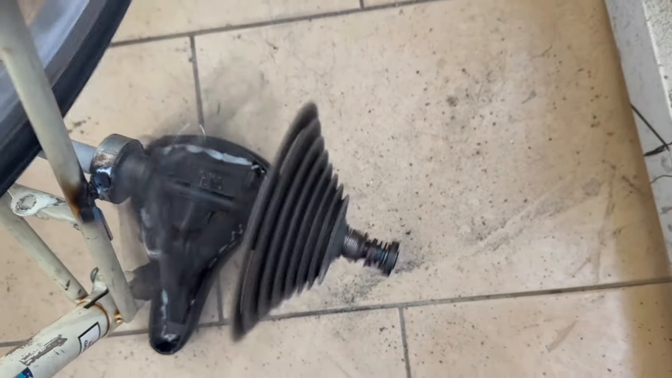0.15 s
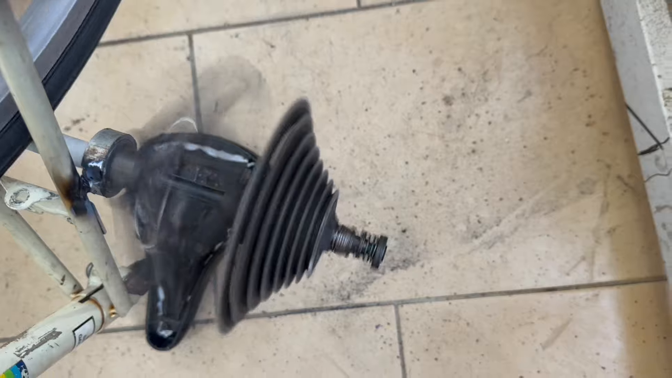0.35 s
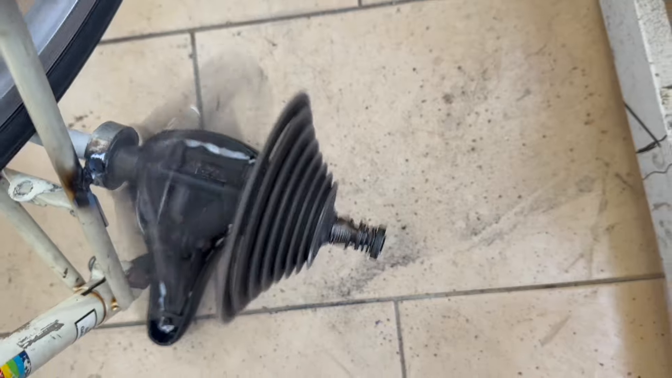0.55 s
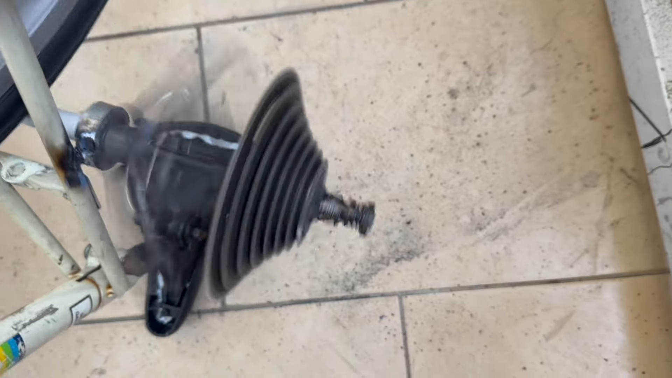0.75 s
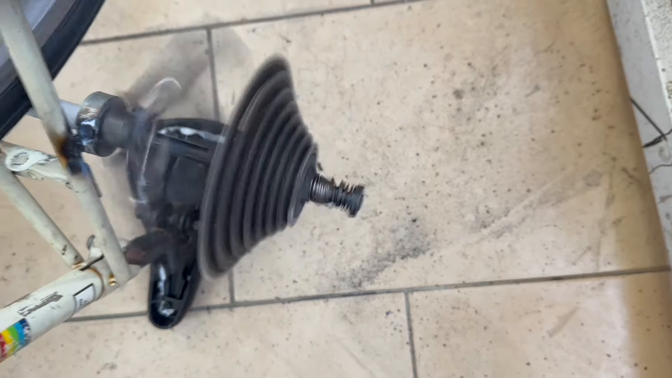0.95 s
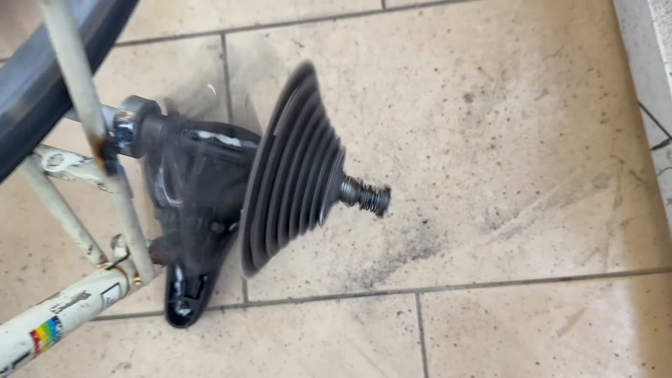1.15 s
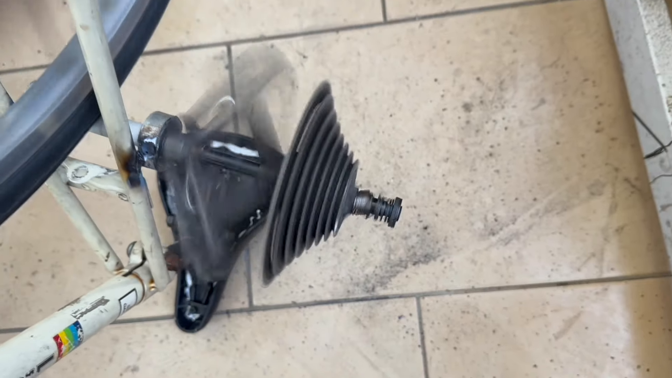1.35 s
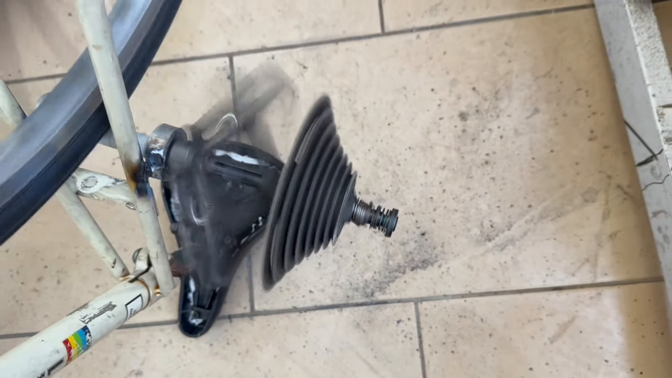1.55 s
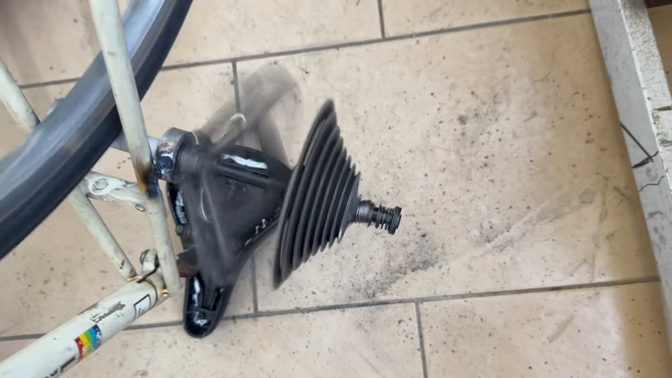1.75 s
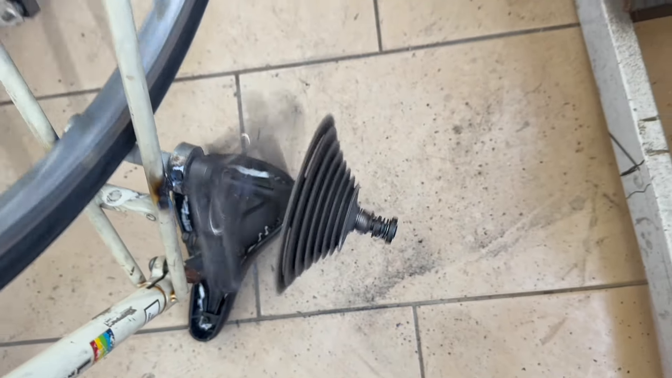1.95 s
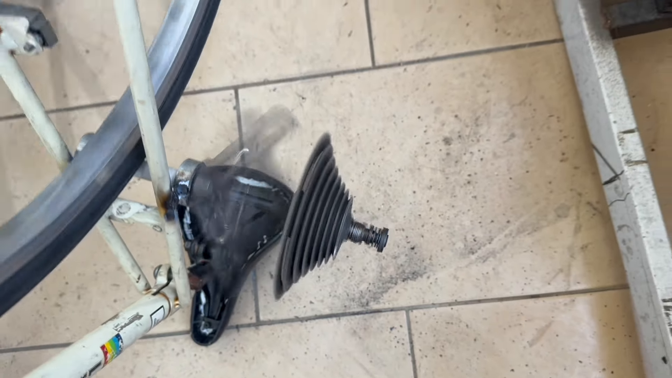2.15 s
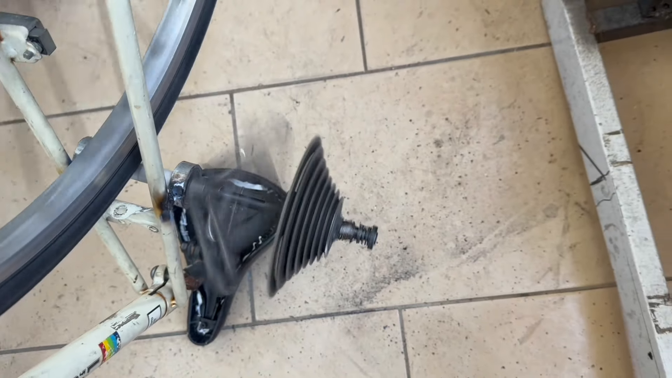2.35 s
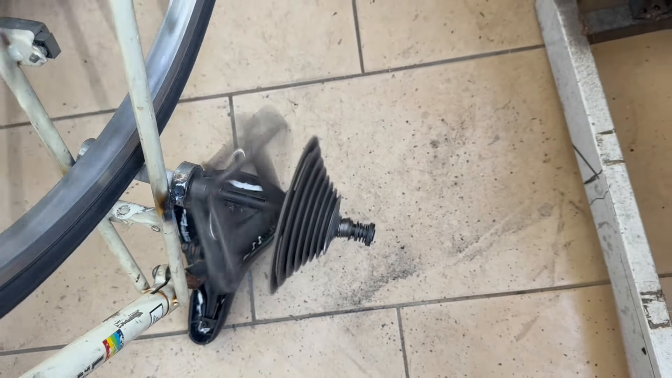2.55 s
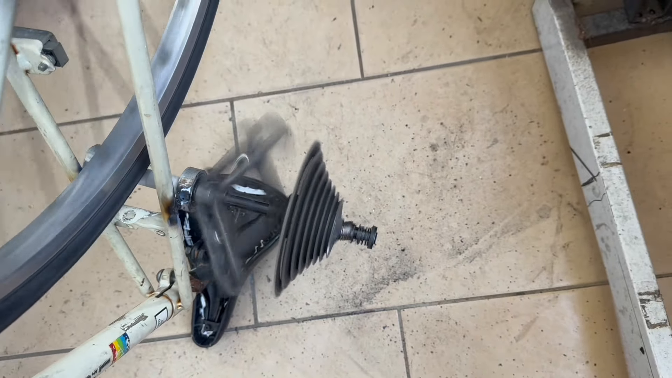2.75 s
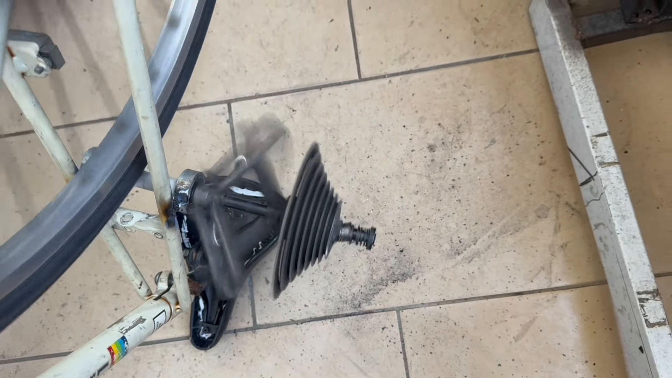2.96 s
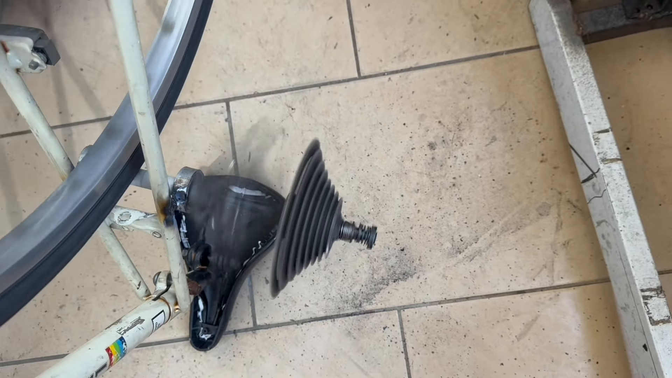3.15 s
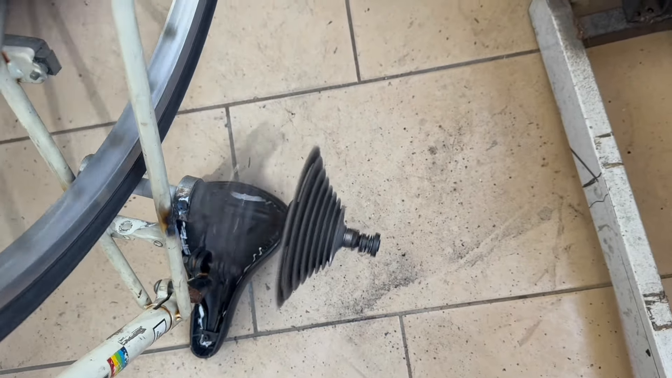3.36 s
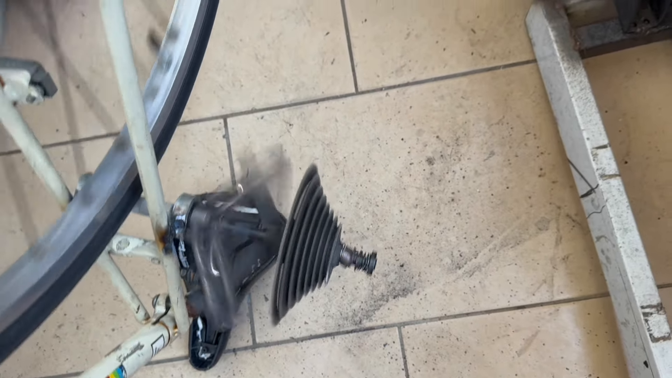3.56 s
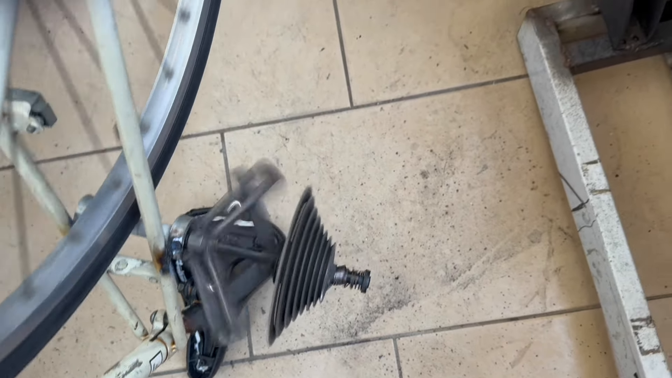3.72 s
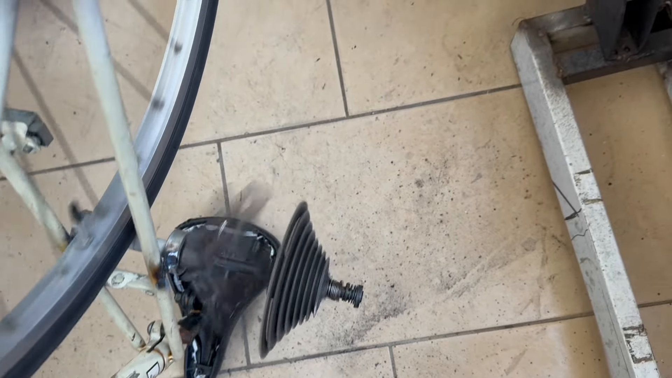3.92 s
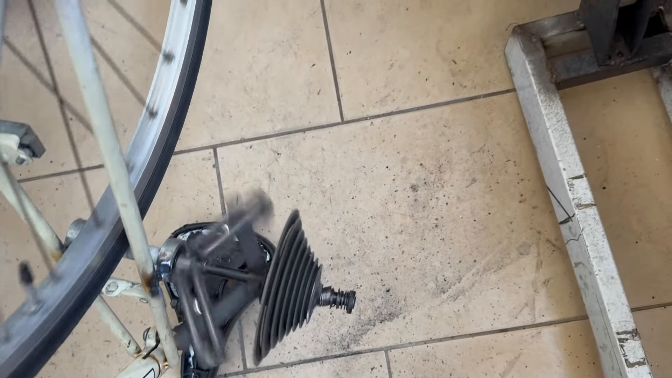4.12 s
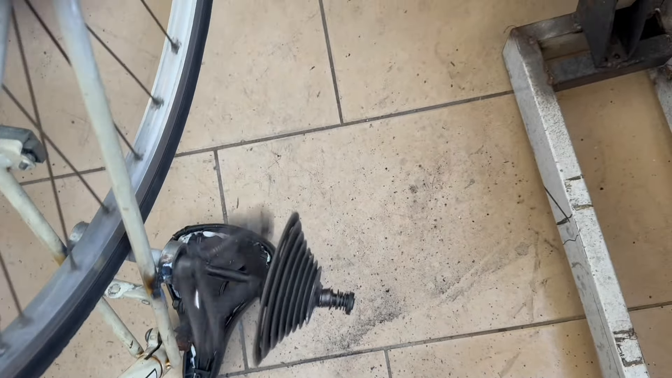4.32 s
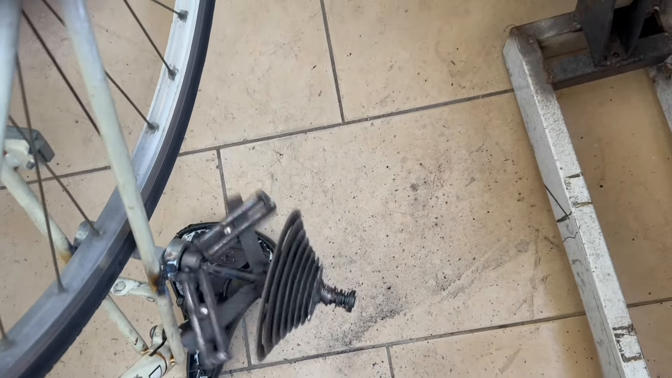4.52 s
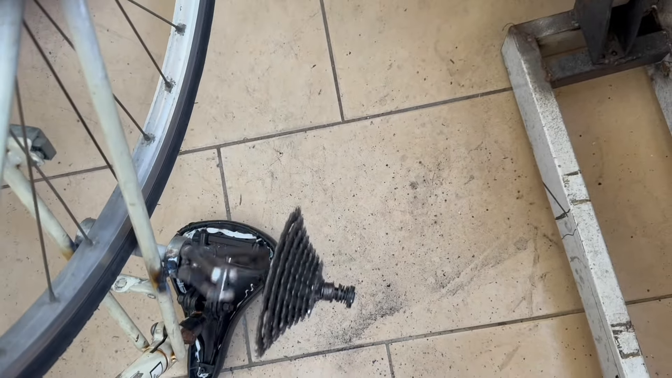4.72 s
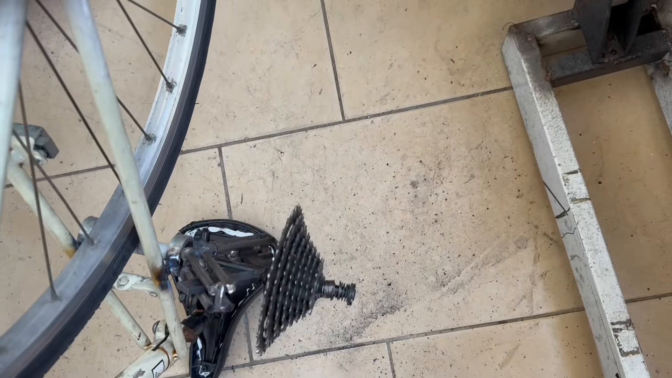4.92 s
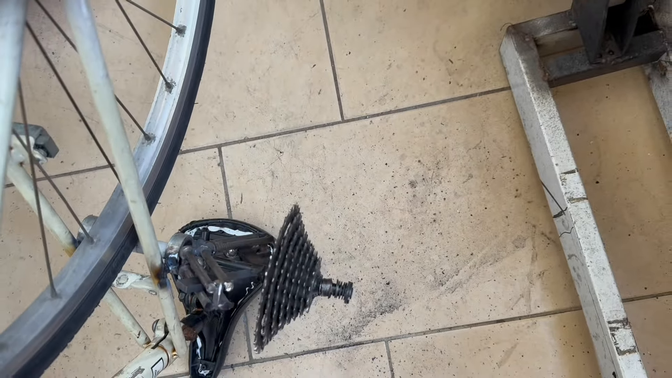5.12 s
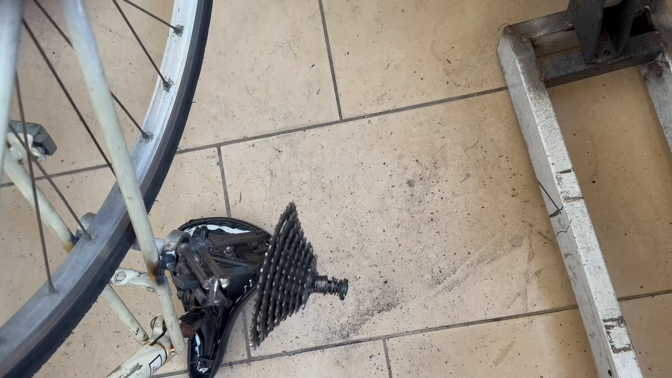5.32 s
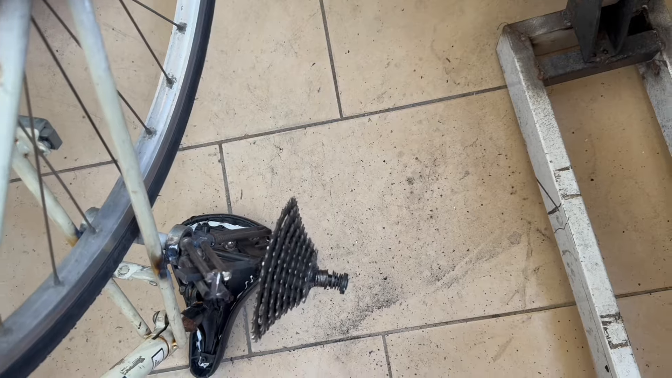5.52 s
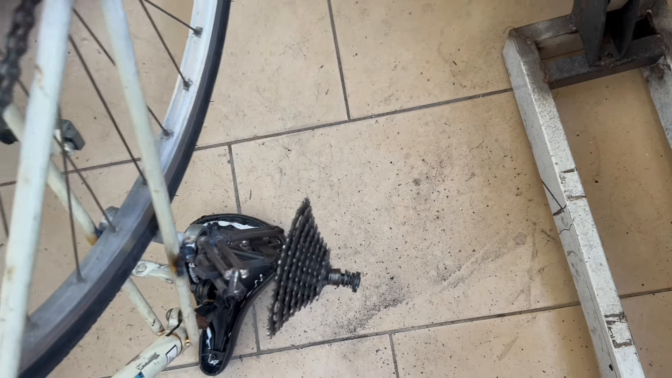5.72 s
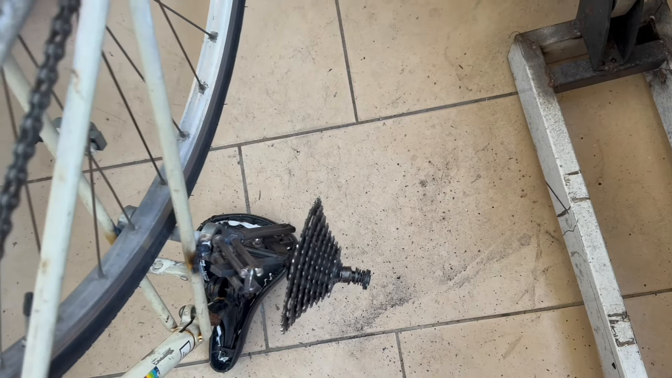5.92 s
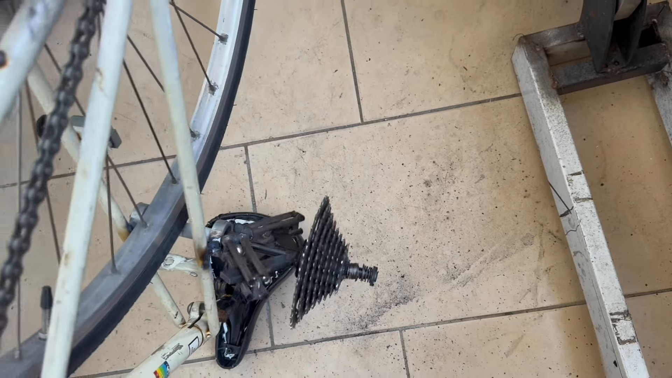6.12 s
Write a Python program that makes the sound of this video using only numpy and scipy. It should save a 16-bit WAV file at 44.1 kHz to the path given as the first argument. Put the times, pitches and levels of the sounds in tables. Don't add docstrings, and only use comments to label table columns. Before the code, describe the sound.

Close up in a tiled workshop, a bicycle freewheel coasts down. Crisp, bright metal clicks begin at over twenty a second, slow gradually, then quickly thin to separate ticks over a fading bearing whir. A cluster of rattling knocks with one hard crack follows the slowdown. Then only low rumble, soft room wash, tiny rubs and a small late tap remain. Stereo, leaning slightly left.

```python
import sys
import numpy as np
from scipy import signal
from scipy.fft import rfft, irfft, next_fast_len
from scipy.io import wavfile
from scipy.ndimage import uniform_filter1d

SR = 44100
rng = np.random.default_rng(int(sys.argv[2]) if len(sys.argv) > 2 else 0)


def master(y):
    cut = np.clip(np.atleast_2d(y).T, -1, 1)
    pcm = np.round(cut * 32767)
    wavfile.write(sys.argv[1], SR, pcm.astype(np.int16))


def field_ratio(decibels):
    return 10 ** (np.asarray(decibels, dtype=float) / 20)


N = 272538

# (time [s], tooth rate [1/s])
TOOTH_RATE = [(0, 23.42), (.6, 19.99), (1.19, 18.2), (1.53, 17.64), (2.18, 16.06), (2.76, 15.17),
              (3.11, 13.48), (3.63, 9.77), (4.5, 2.44)]
# (time [s], snap peak [dB])
NEARNESS = [(0, -4), (.3, -9), (.55, -6), (1.1, -3.5), (1.5, -5), (1.95, -7), (2.3, -5), (2.9, -6.5),
            (3.3, -8.5), (3.7, -6.5), (4.15, -8), (4.4, -11.5)]
# (tooth number [1]), and for each (level change [dB])
ODD_TEETH = (1, 4, 7, 11, 20, 25, 30, 43, 46, 51, 56, 64)
ODD_TEETH_DB = (0, 3.5, -4.5, 3, -3, 1.5, -1, 4, -2.5, -3.5, -11, 1)
BAND_SHARES_DB = (3, -3, -0.5, 2, -1.5, -5.5)
# (depth [dB]), and for each (phase [turns])
TINT_DB = (-3, -1.6, -1, 1.7, 1.5, 3)
TINT_TURN = (0, .08, 0, 0.38, -0.074, -0.046)
# (frequency [Hz], level [dB], t60 [s])
COG_MODES = [(930, -28, 0.29), (1342, -19.5, 0.24), (2056, -22, 0.17), (2267, -22.5, 0.14),
             (3580, -18.5, 0.13), (3810, -14, 0.13), (4200, -13.5, .08), (4620, -7.5, 0.07),
             (4810, -18.5, 0.27), (5870, -10, 0.068), (6460, -7.5, .08), (6286, -11.5, 0.15),
             (6750, -14.5, 0.11), (6860, -16, 0.072), (8010, -13.5, 0.089), (8430, -10.5, 0.042),
             (8900, -19, 0.055), (9260, -9.5, 0.029), (10320, -15, 0.042), (13500, -31, .05)]
# (frequency [Hz], density [dB per Hz])
DENSE_RING = [(700, -15.5), (1400, -12.5), (3000, -8.5), (4700, 0), (5500, -5), (6400, -7.5), (7400, -8),
              (9200, -4.5), (11000, -5), (12200, -7.5), (13500, -1), (14300, -9.5), (15700, -19.5),
              (16500, -44.5)]
# (frequency [Hz], t60 [s])
RING_T60 = [(1000, 0.11), (3000, 0.067), (6000, 0.14), (9000, 0.1), (15000, 0.069)]
# (frequency [Hz], rise [s])
RING_RISE = [(1000, 0.0051), (3000, 0.0033), (6000, 0.00047)]
# (time [s], peak [dB], ringing [Hz], brightness [dB], t60 [s])
KNOCKS = [
    (4.3218, -27.5, 2760, -31, 0.15),
    (4.504, -18, 3420, -29.5, 0.097),
    (4.585, -23, 3050, -37, 0.15),
    (4.645, -35.5, 2970, -34, 0.11),
    (4.688, -14.5, 4200, -14.5, 0.23),
    (4.7167, 3, 4900, 5, 0.04),
    (4.7259, -4.5, 3085, -17, 0.12),
    (5.412, -31, 1615, -66, 0.14),
    (5.465, -31, 1680, -46, 0.25),
]
# (frequency [Hz], width [Hz], lift [dB])
FRAME_MODES = [(1380, 52, 19.5), (1810, 290, 7), (2450, 170, 8.5), (2920, 100, -0.5), (3250, 110, 2),
               (4180, 340, 5), (4900, 144, 6), (6660, 330, 11.5), (8800, 600, 10)]
# (frequency [Hz], width [Hz], lift [dB])
TAP_MODES = [(1740, 780, 14.5), (4520, 600, 15), (8540, 740, 7), (10700, 1200, -4), (14000, 1300, -7.5)]
# (time [s], level [dB], centre [Hz], width [Hz], length [s])
RUBS = [
    (4.92, -60, 6900, 1100, 0.06),
    (5.097, -56, 6870, 1600, 0.053),
    (5.258, -55.5, 6800, 2200, 0.092),
    (5.325, -59, 7440, 900, 0.063),
    (5.629, -57, 5000, 800, 1),
    (5.65, -56.5, 8000, 12000, 0.64),
    (5.84, -49.5, 9820, 12200, 0.22),
]
# (time [s], level [dB], final pitch [Hz], t60 [s])
THUMPS = [
    (2.062, -23.5, 73, 0.11),
    (5.7, -25, 74, 0.09),
]
# (frequency [Hz], density [dB per Hz])
WHIR_COLOUR = [(240, -31.5), (400, -11), (1020, -11), (1370, -4.5), (1730, -2), (2020, -0.5), (3110, -7.5),
               (4000, -14.5), (5200, -37.5), (8800, -120)]
# (frequency [Hz], width [Hz], level [dB])
WHIR_MODES = [(1362, 49, -3.5), (1452, 70, -0.5), (1244, 60, 0.5), (1980, 190, -27.5), (900, 120, -4.5),
              (786, 190, 2.5), (2390, 1200, -11)]
# (frequency [Hz], density [dB per Hz])
HISS_COLOUR = [(2500, -23), (4000, 0.5), (6400, -3.5), (9000, -7), (11000, -6.5), (14000, -8),
               (15500, -14.5), (16500, -54)]
# (frequency [Hz], density [dB per Hz])
ROOM_COLOUR = [(130, -11), (200, -12), (360, -12), (800, -19), (1670, -29), (3000, -40.5), (4000, -47),
               (7500, -49), (9500, -50), (12000, -54), (15000, -58), (15800, -61), (16400, -90)]
# (frequency [Hz], density [dB per Hz])
RUMBLE_COLOUR = [(8.8, -39.5), (15, -17.5), (54, 5.5), (74, 4.5), (108, -20), (130, -8), (170, -27.5),
                 (290, -120)]
# (time [s], added level [dB])
SWELLS = [(0, 11), (.77, 8), (1.25, 6), (1.46, 2), (1.65, 1.5), (2.08, 1), (2.81, 6), (3.2, 2.5), (3.52, 3),
          (3.68, 6.5), (4.13, 2), (4.5, 3.5), (4.77, 4), (5.39, 0), (5.72, 2), (5.88, 6.5), (6.15, 2.5)]
# (frequency [Hz], left-right likeness [1])
LIKENESS = [(60, 0.98), (200, 0.88), (400, 0.58), (800, 0.34), (2400, 0.32), (4400, 0.34), (7000, 0.32)]
# (frequency [Hz], left minus right [dB])
LEAN = [(60, 0), (150, -3), (300, 0.5), (700, 3), (2000, 4), (5000, 3.5), (7500, 6.5), (8200, 3.5)]

TEETH, FIRST_TOOTH = 67, 0.365
WOBBLE_PER_TOOTH, WOBBLE_DB, WOBBLE_TURN = 5 / 13, 3.5, 0.03
SCATTER_DB = 0.88
TONES_DB, SNAP_DB = 2, -9.5
TICK_DB, TICK_FOLLOW = 1, 0.6
TICK_LOW_HZ, TICK_HIGH_HZ, TICK_SPREAD_S = 3400, 9500, 0.001
RATTLE_S = 0.01
TAP_S, TAP_DB, TAP_RISE_S, TAP_T60 = 5.729, -22, 0.0042, 0.13
WHIR_DB, WHIR_POWER, WHIR_REST_DB = -25.5, 2.52, -57.5
HISS_DB, HISS_POWER, HISS_REST_DB = -31.5, 2.5, -56.5
ROOM_DB, SHAKE_DB = -35, 4.5
RUMBLE_DB, LUMPS_DB, SWELL_S = -36.5, 1, 0.028
MERGE_HZ, ALIGNED_HZ, COMB_HZ = 7990, 8000, 3040
EDGE_HZ = 16000


def pawl():
    places, out, t = strikes(count=8), np.zeros((2, N)), np.arange(12000) / SR
    tooth = np.arange(TEETH)
    at = np.searchsorted(np.cumsum(curve(TOOTH_RATE)) / SR - FIRST_TOOTH, tooth)
    wobble_turns = WOBBLE_PER_TOOTH * tooth
    level_db = curve(NEARNESS)[at] + WOBBLE_DB * np.cos(2 * np.pi * (wobble_turns + WOBBLE_TURN))
    level_db += sum(db * (tooth == k) for k, db in zip(ODD_TEETH, ODD_TEETH_DB))
    tints_db = np.multiply(TINT_DB, np.cos(2 * np.pi * np.add.outer(wobble_turns, TINT_TURN)))
    blends, scatter = rng.standard_normal((TEETH, 8)), rng.standard_normal((TEETH, 6))
    all_shares = field_ratio(BAND_SHARES_DB + tints_db + SCATTER_DB * scatter)
    sharp_start = 1 + 1.06 * np.exp(-t / 0.0012)
    usual_power = np.mean(places[..., :600] ** 2, axis=(0, 2, 3))[:, None, None]
    for n, db, shares, blend in zip(at, level_db, all_shares, blends):
        bands = np.tensordot(evened(blend) / np.sqrt(8), places, 1)
        power = np.mean(bands[..., :600] ** 2, axis=(1, 2), keepdims=True)
        bands /= np.sqrt(power / usual_power)
        add(out, n / SR, field_ratio(TICK_DB + TICK_FOLLOW * db) * contact())
        ring = np.tensordot(shares, bands, 1)
        add(out, n / SR, field_ratio(db + SNAP_DB) * sharp_start * chatter(t, 1.3, 0.014) * ring)
    return out


def strikes(count):
    edges = (0, 3000, 5400, 7400, 9800, 12500, 22050)
    t, hz = np.arange(12000) / SR, np.fft.rfftfreq(12000, 1 / SR)
    out = np.zeros((count, len(edges) - 1, 2, len(t)))
    for place in out:
        dense = rfft(noise(lambda f: read(DENSE_RING, f), len(t)))
        for band, lo, hi in zip(place, edges, edges[1:]):
            centre = np.sqrt((lo + 700) * hi)
            rise = 1 - np.exp(-t / read(RING_RISE, centre))
            decay = field_ratio(-60 * t / read(RING_T60, centre))
            band += irfft(dense * ((hz >= lo) & (hz < hi))) * rise * decay
            band += sum(mode(t, f, TONES_DB + db, t60) for f, db, t60 in COG_MODES if lo <= f < hi)
    return out


def contact():
    touches = np.zeros(400)
    at = (10 + rng.random(4) * TICK_SPREAD_S * SR).astype(int)
    touches[at] = rng.uniform(0.5, 1, 4) * rng.choice([-1, 1], 4)
    band = signal.butter(2, [TICK_LOW_HZ, TICK_HIGH_HZ], "band", fs=SR, output="sos")
    click = signal.sosfilt(band, touches)
    return np.array([click, np.roll(click, -1)]) / np.linalg.norm(click)


def knocks():
    out, t = np.zeros((2, N)), np.arange(12000) / SR

    def frame(f):
        return sum(lift / (1 + (2 * (f - centre) / width) ** 2) for centre, width, lift in FRAME_MODES)

    for s, db, hz, bright_db, t60 in KNOCKS:
        slope_hz = [0.35 * hz, 0.75 * hz, 1.6 * hz, 6000, 10500, 14000, 16500]
        slope_db = [-28, -6, -6, 0.55 * bright_db + 3.5, bright_db + 13.0, bright_db + 11.0, bright_db - 31.5]
        slope = lambda f: np.interp(f, slope_hz, slope_db)
        colour = lambda f: slope(f) + frame(f) + 6.6 * np.exp(-((f / hz - 1) / 0.18) ** 2)
        rise_s = 0.0008 * (3400 / hz) ** 2.5
        decay = field_ratio(-60 * np.maximum(t - RATTLE_S, 0) / t60)
        shape = np.clip(t / rise_s, 0, 1) * decay * chatter(t, 4.7, 0.021)
        ring = sum(mode(t, hz * ratio, -5, 1.19 * t60) for ratio in (0.9, 1, 1.09))
        ring += mode(t, FRAME_MODES[0][0], -9, 0.15, detune=0.0024)
        ring += sum(mode(t, f, slope(f) + 1.5, 1.3 * t60, detune=0.007) for f, _, _ in FRAME_MODES[1:7])
        rattle = noise(colour, len(t), size=1024) * shape
        add(out, s - 0.5 * rise_s, field_ratio(db - 12.5) * (rattle + field_ratio(-5) * ring))
    return out


def tap():
    out, t = np.zeros((2, N)), np.arange(9000) / SR - 0.03

    def colour(f):
        peaks = sum(db / (1 + (2 * (f - hz) / width) ** 2) for hz, width, db in TAP_MODES)
        return peaks - 25 * (f < 1300) - 30 * (f > 15800)

    scrape = np.exp(np.minimum(t, 0) / TAP_RISE_S)
    shape = np.where(t < 0, scrape, field_ratio(-60 * t / TAP_T60)) * chatter(t + 0.026, 2.7, 0.06)
    add(out, TAP_S - 0.03, field_ratio(TAP_DB) * noise(colour, len(t), size=1024) * shape)
    return out


def rubs():
    out = np.zeros((2, N))
    for s, db, hz, width_hz, length in RUBS:
        count = round(length * SR)
        puff = noise(lambda f: -12 * (2 * (f - hz) / width_hz) ** 2 / 2, count)
        add(out, s - length / 2, field_ratio(db) * puff * np.hanning(count))
    t = np.arange(8000) / SR
    for s, db, hz, t60 in THUMPS:
        sagging_t = t + 0.017 * (1 - np.exp(-t / 0.0085))
        add(out, s, np.ones((2, 1)) * field_ratio(db - 60 * t / t60) * np.sin(2 * np.pi * hz * sagging_t))
    return out


def whir():
    def colour(f):
        peaks = sum(field_ratio(2 * db) / (1 + (2 * (f - hz) / w) ** 2) for hz, w, db in WHIR_MODES)
        return read(WHIR_COLOUR, f) + 10 * np.log10(0.026 + peaks)

    fade = np.clip((5.0 - np.arange(N) / SR) / 0.26, 0, 1)
    body_level = field_ratio(WHIR_DB) * spin() ** WHIR_POWER + field_ratio(WHIR_REST_DB)
    body = body_level * noise(colour, N, size=2048, patchy_db=1.65)
    grain = field_ratio(2.8 * evened(uniform_filter1d(rng.standard_normal(N), size=90)))
    hiss_level = field_ratio(HISS_DB) * spin() ** HISS_POWER + field_ratio(HISS_REST_DB)
    hiss = hiss_level * grain * noise(lambda f: read(HISS_COLOUR, f), N, size=256, patchy_db=3.0)
    return (body + hiss) * fade


def room():
    wash = noise(lambda f: read(ROOM_COLOUR, f) - 30 * (f < 105), N, size=2048, patchy_db=2.0)
    rumble, t = noise(lambda f: read(RUMBLE_COLOUR, f), N, size=4096), np.arange(N) / SR
    rumble /= (0.1 + uniform_filter1d(rumble[0] ** 2, size=1500)) ** 0.33
    lumps = evened(uniform_filter1d(uniform_filter1d(rng.standard_normal(N), size=2500), size=2500))
    swells_db = sum(db * np.exp(-0.5 * ((t - s) / SWELL_S) ** 2) for s, db in SWELLS)
    rumble_db = RUMBLE_DB + 4.0 * spin() + swells_db + LUMPS_DB * lumps
    return field_ratio(ROOM_DB - 3.0 + SHAKE_DB * spin()) * wash + field_ratio(rumble_db) * rumble


def spin():
    return curve(TOOTH_RATE) / TOOTH_RATE[0][1]


def mode(t, hz, db, t60, detune=0.008):
    off, start, apart = rng.standard_normal(3)
    phase = 2 * np.pi * hz * (1 + detune * off) * t + 3 * start + np.array([[0], [1.03 * apart]])
    return np.sin(phase) * field_ratio(db - 60 * t / t60) * (1 - np.exp(-t / read(RING_RISE, hz)))


def chatter(t, spread_db, fade_s):
    bounces = evened(uniform_filter1d(rng.standard_normal(len(t)), size=30))
    return field_ratio(spread_db * bounces * np.exp(-t / fade_s))


def noise(db_at, count, size=512, patchy_db=0.):
    frames, hz = count // (size // 4) + 5, np.fft.rfftfreq(size, 1 / SR)
    a, b, c, d, patches = rng.standard_normal((frames, len(hz), 5)).T
    patches = evened(uniform_filter1d(uniform_filter1d(patches, size=6, axis=0), size=12, axis=1))
    same = np.clip(read(LIKENESS, hz), -1, 1)[:, None]
    left = a + 1j * b
    right = same * left + np.sqrt(1 - same ** 2) * (c + 1j * d)
    spectra = np.array([left, right]) * field_ratio(db_at(hz)[:, None] + patchy_db * patches)
    return evened(signal.istft(spectra, nperseg=size, noverlap=size * 3 // 4)[1][:, :count])


def evened(x):
    return x / np.sqrt(np.mean(x ** 2) + 1e-20)


def read(points, hz):
    f, value = np.transpose(points)
    return np.interp(np.log(hz + 1), np.log(f + 1), value)


def curve(rows):
    return np.interp(np.arange(N) / SR, [r[0] for r in rows], [r[1] for r in rows])


def add(mix, s, sound):
    part = mix[:, round(s * SR):][:, :sound.shape[1]]
    part += sound[:, :part.shape[1]]


def scene():
    return pawl() + knocks() + tap() + rubs() + whir() + room()


def low_pass(x):
    return signal.sosfilt(signal.butter(12, 16430, fs=SR, output="sos"), x)


def record(dry):
    size = next_fast_len(N + 4096)
    hz, z = np.fft.rfftfreq(size, 1 / SR), rfft(dry, size)
    z = z * field_ratio(np.outer([0.5, -0.5], read(LEAN, hz)))
    merged = 0.93 * np.clip((hz - MERGE_HZ) / 600 + 0.5, 0, 1)
    early = z[0] * np.exp(2j * np.pi * (hz - ALIGNED_HZ) / COMB_HZ)
    z[1] = np.sqrt(1 - merged ** 2) * z[1] + merged * early
    z = z / (1 + (hz / EDGE_HZ) ** 80)
    mix = np.clip(irfft(z, size)[:, :N], -1, 1)
    return low_pass(mix)


dry = scene()
out = record(dry)
master(out)
```